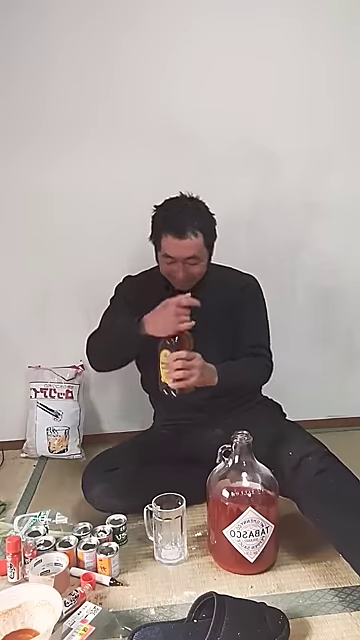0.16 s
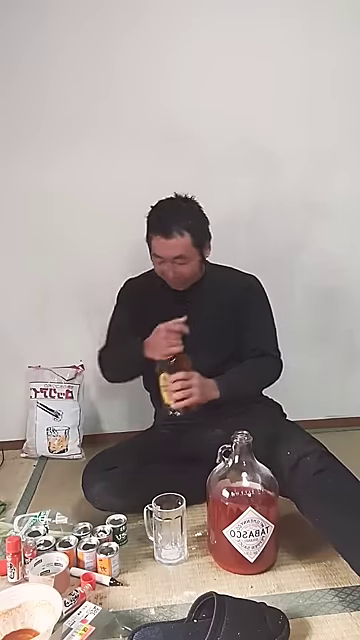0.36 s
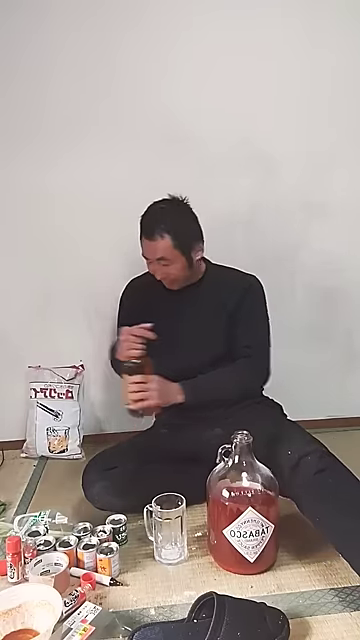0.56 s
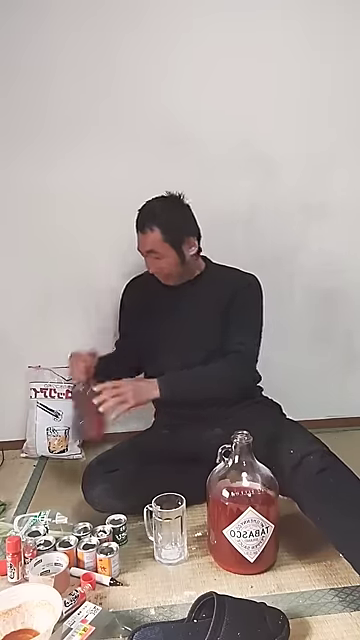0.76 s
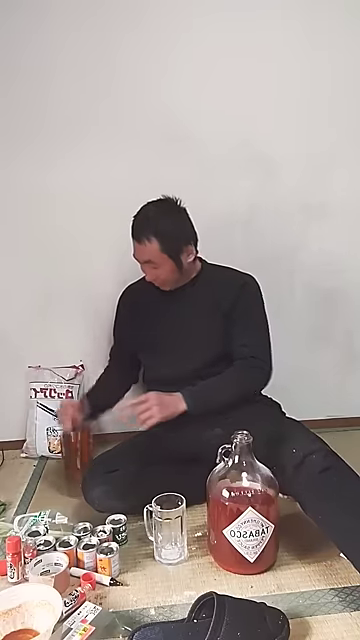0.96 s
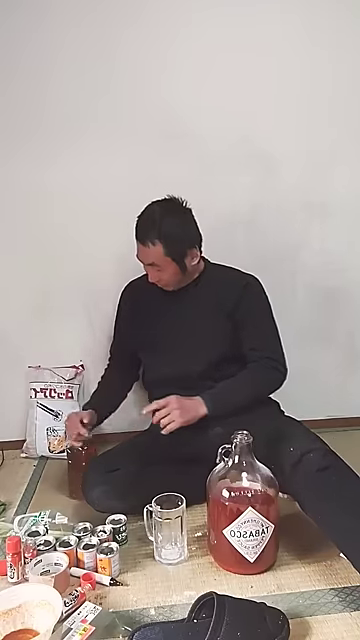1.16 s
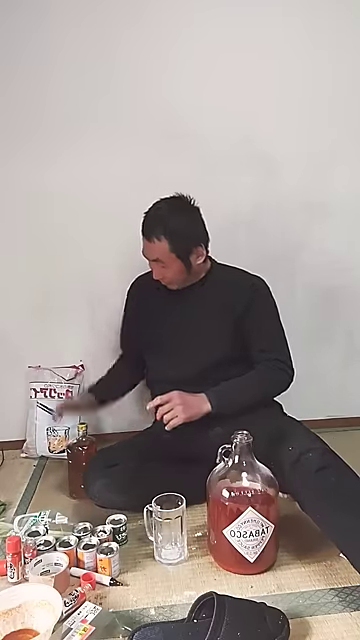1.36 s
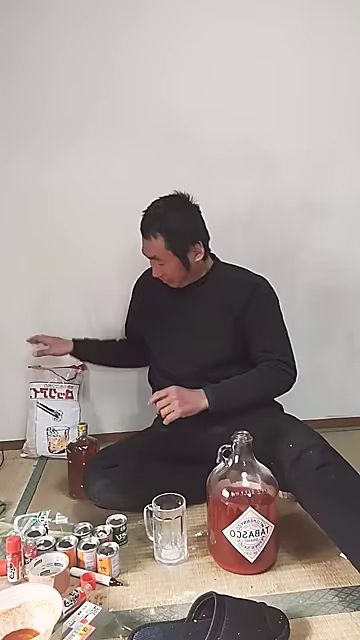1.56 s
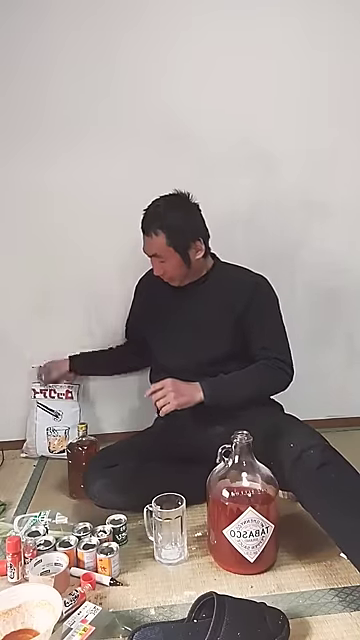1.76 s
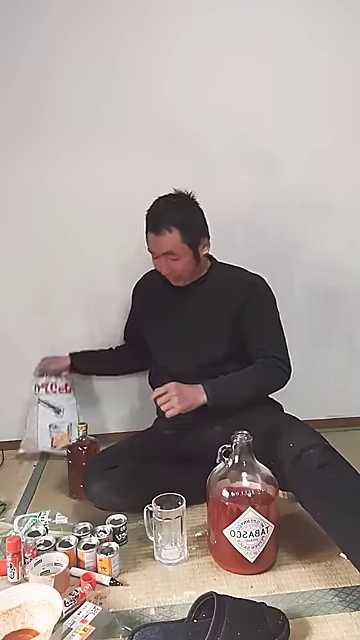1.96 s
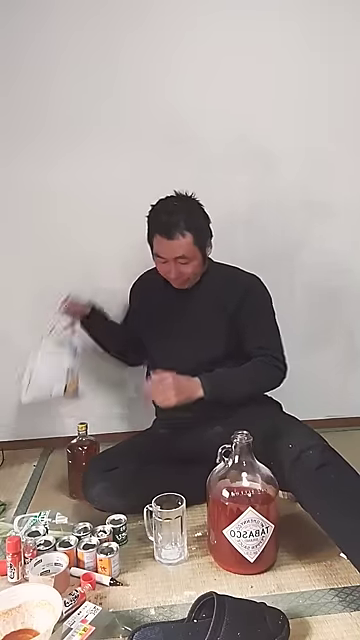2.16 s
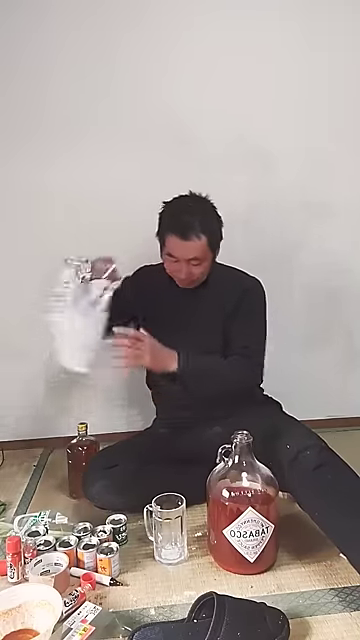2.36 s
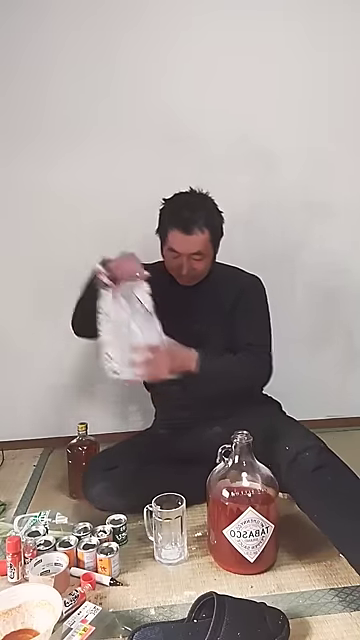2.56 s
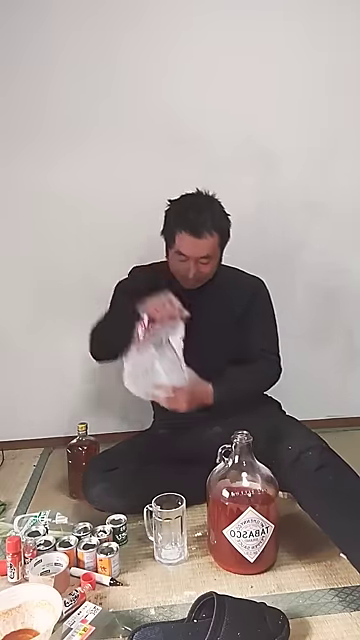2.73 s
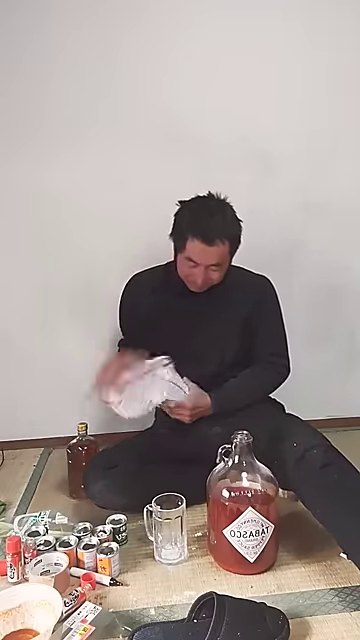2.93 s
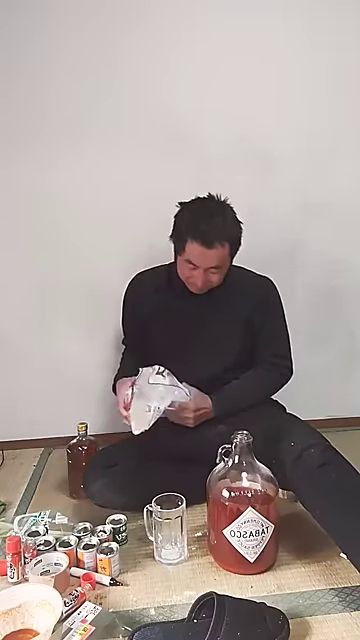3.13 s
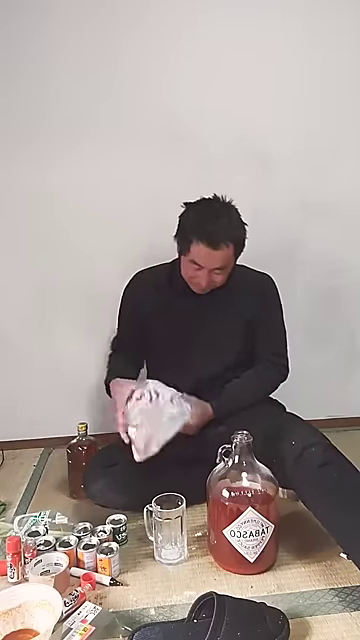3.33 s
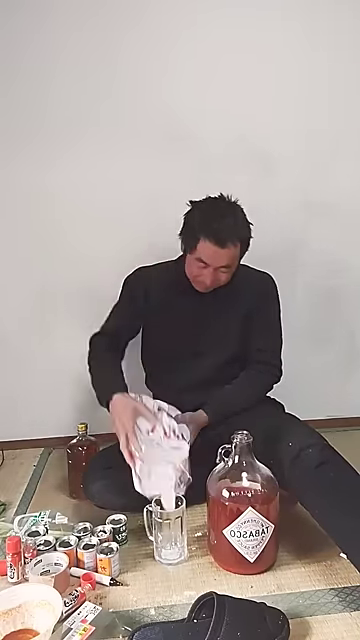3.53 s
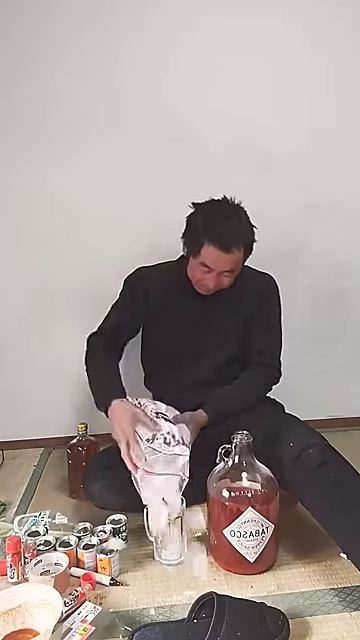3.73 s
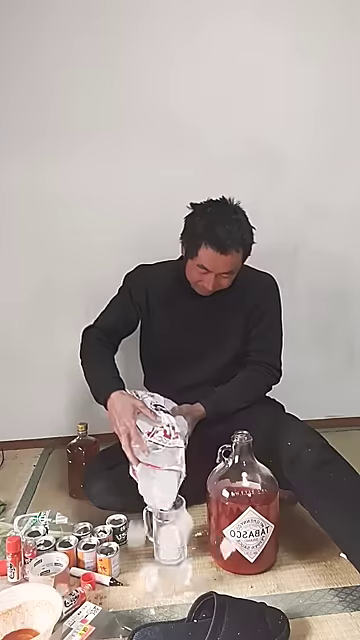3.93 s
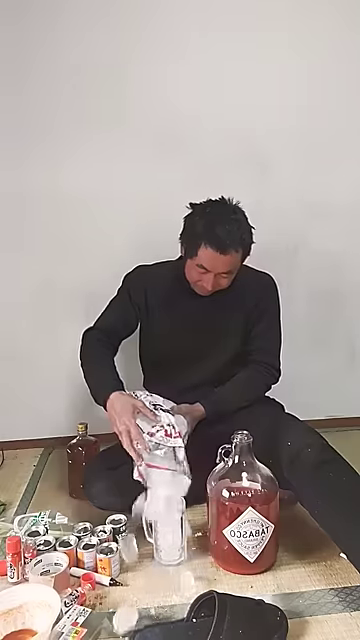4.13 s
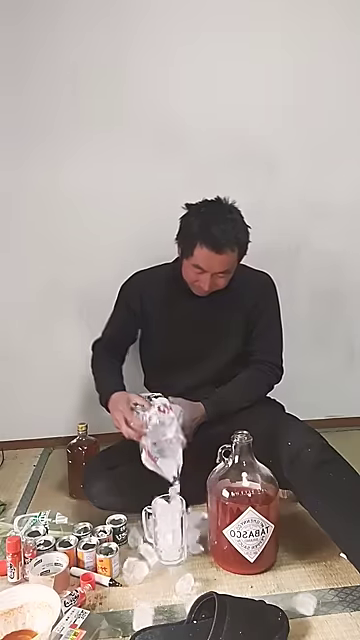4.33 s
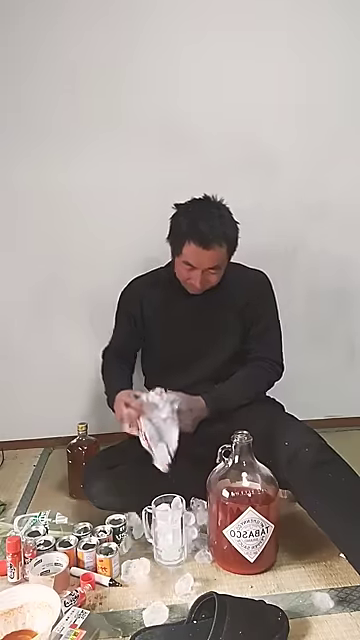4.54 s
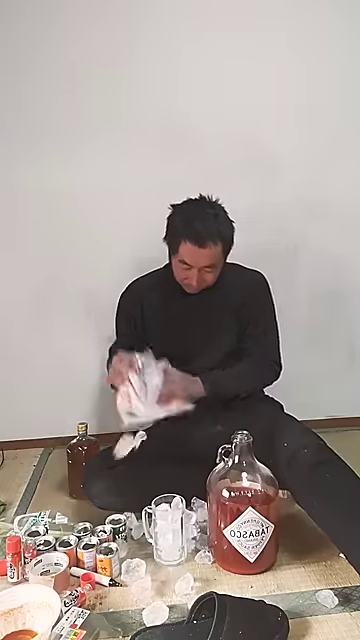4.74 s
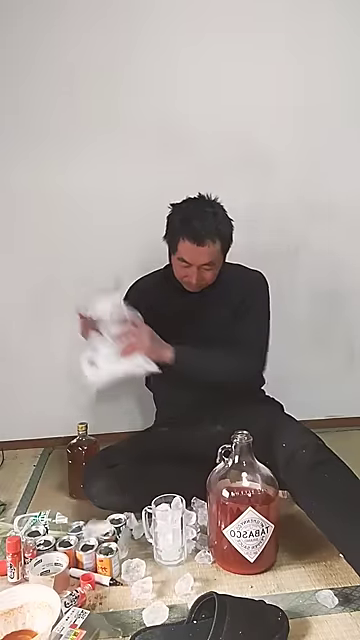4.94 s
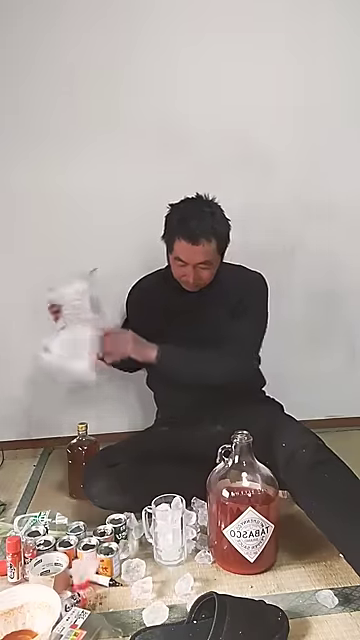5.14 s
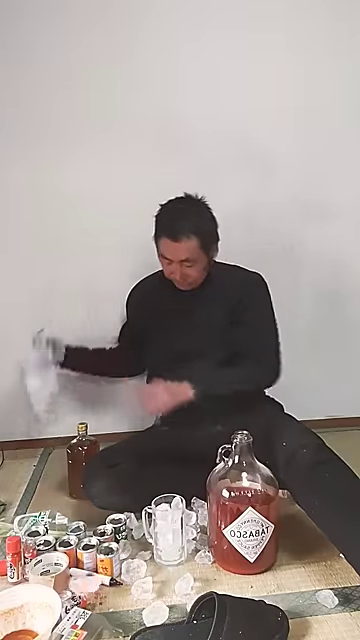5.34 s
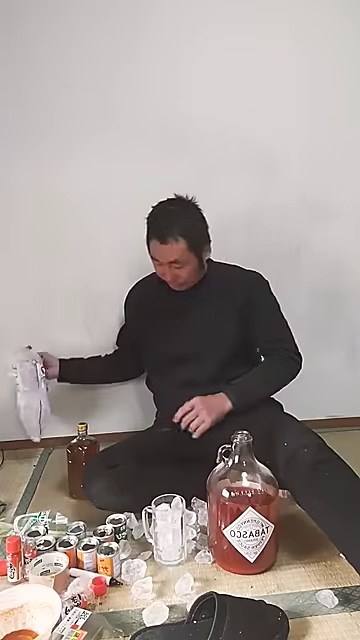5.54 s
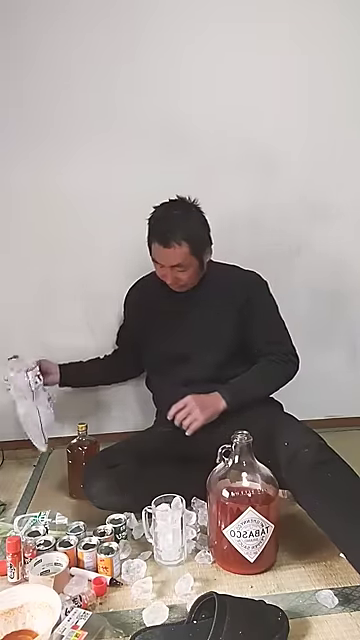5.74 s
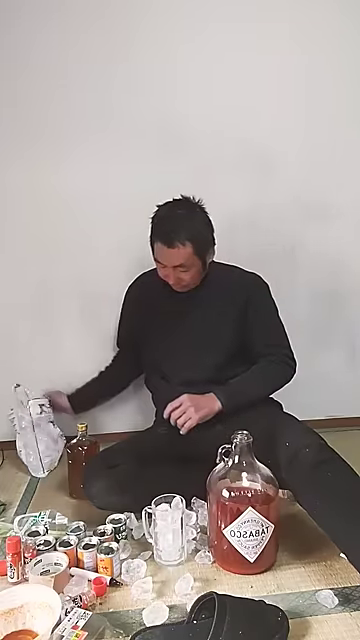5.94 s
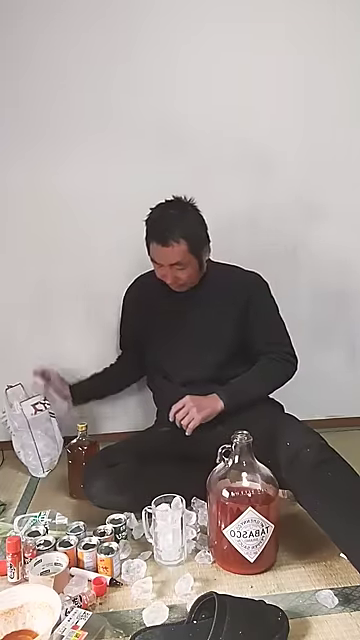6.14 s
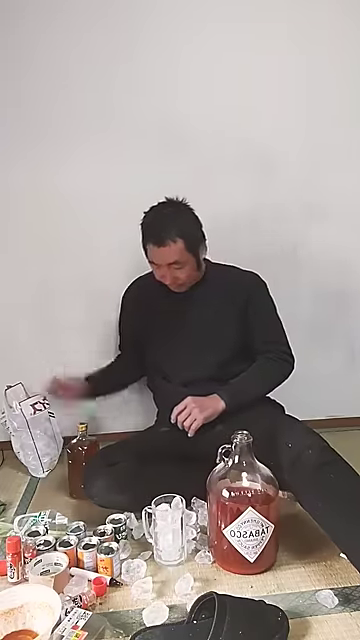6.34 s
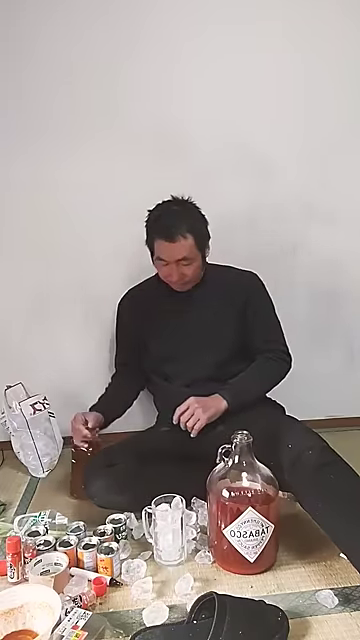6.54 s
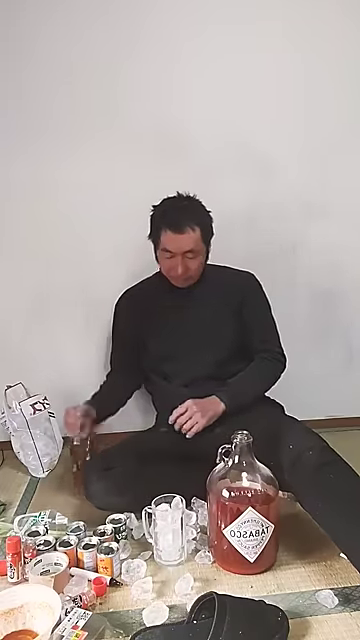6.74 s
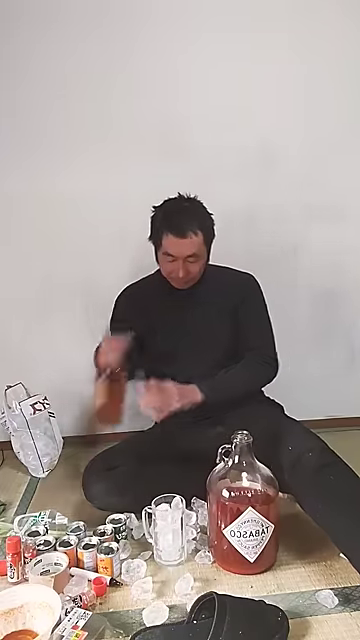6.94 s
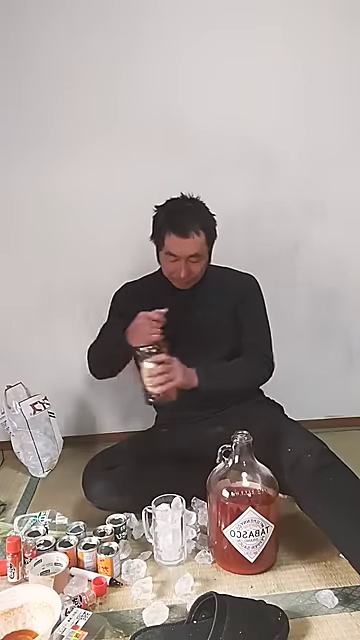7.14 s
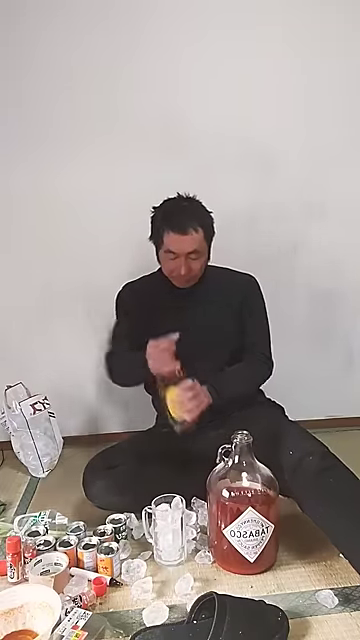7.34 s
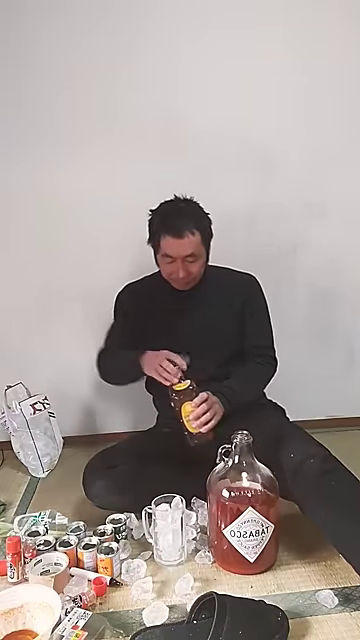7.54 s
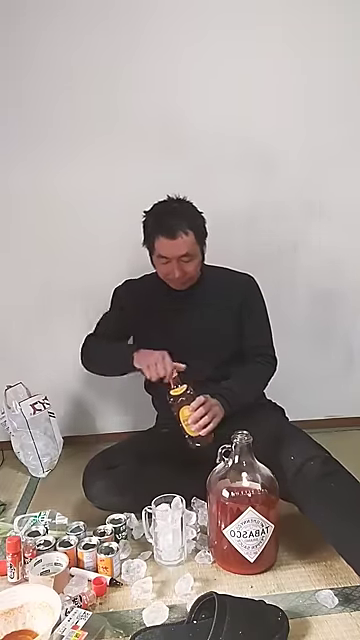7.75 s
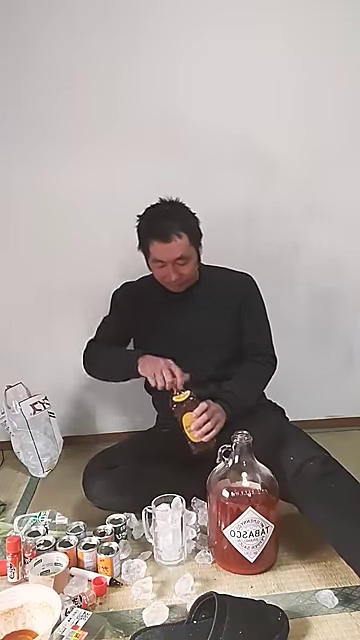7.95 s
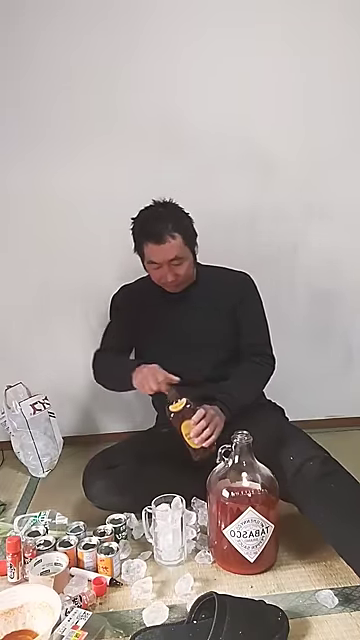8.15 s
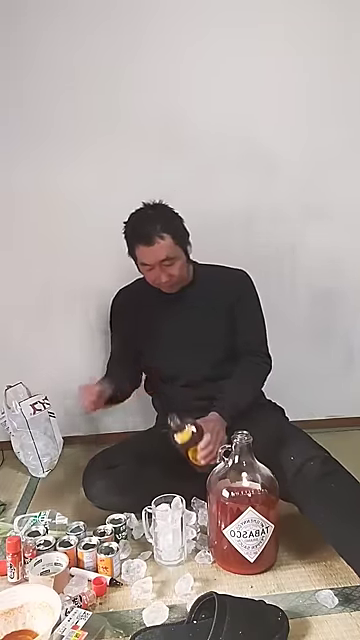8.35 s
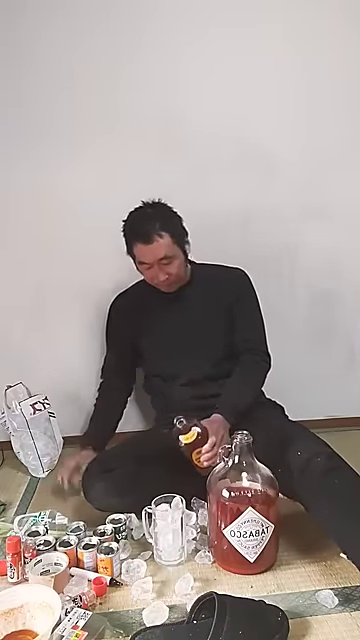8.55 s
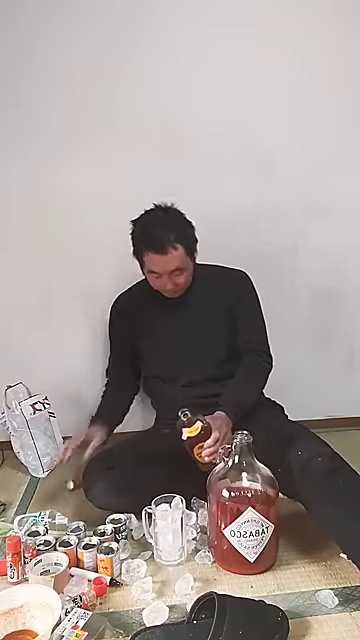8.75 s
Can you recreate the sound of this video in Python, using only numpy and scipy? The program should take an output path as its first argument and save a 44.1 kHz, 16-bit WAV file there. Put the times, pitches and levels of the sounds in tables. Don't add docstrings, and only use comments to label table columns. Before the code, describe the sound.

A bottle thuds onto a mat floor, a plastic ice bag crackles, cubes clatter brightly into a glass mug, then a cap is faintly unscrewed.

```python
import sys
import numpy as np
from scipy import signal
from scipy.fft import rfft, irfft
from scipy.io import wavfile

SR = 44100
rng = np.random.default_rng(int(sys.argv[2]) if len(sys.argv) > 2 else 0)


def put_to_file(sound):
    columns = np.atleast_2d(sound).T
    safe = np.clip(columns, -1, 1)
    whole_steps = np.round(safe * 32767)
    wavfile.write(sys.argv[1], SR, whole_steps.astype(np.int16))


def amplitude_ratio(level_db):
    exponent = np.asarray(level_db, float) / 20
    return 10 ** exponent


N = 392049

# time in seconds, rustle level in dB, share of dull grinding in dB.
HANDLING = [(0, -91, -26), (1.0, -83, -5), (1.14, -69, -5), (1.7, -66, -4.5), (1.72, -50, -8),
            (2.5, -49, -18), (2.72, -34, -17), (3.2, -43.5, -16.5), (3.5, -31.5, -15.5), (3.72, -37, -8.5),
            (4.3, -27, -12), (4.5, -44, -9.5), (5.9, -43, -13.5), (6.22, -46.5, -10), (6.3, -68, -10),
            (8.55, -79.5, -12), (8.61, -78, 1), (8.8, -76, -14)]
# start in seconds, peak in dB, favoured pitch in Hz, whole body in dB.
CLINKS = [(3.555, -8, 9140, -9), (3.6406, -26, 6230, -24.5), (3.7, -27, 6600, -25.5),
          (3.7339, -14, 14700, -30), (3.7594, -12, 10420, -30), (3.8005, -10, 9140, -19),
          (3.8204, -16, 6600, -23), (3.8721, -14, 6636, -18.5), (3.829, -23, 3270, -45),
          (3.8725, -15, 3270, -45), (3.8994, -26, 3270, -25), (3.9392, -14, 3270, -20),
          (3.9694, -19.5, 3270, -25), (3.9946, -23.5, 3270, -25), (4.0221, -11.5, 3260, -27),
          (4.0488, -16, 3280, -20), (4.0747, -11.5, 6900, -22), (4.0849, -2, 4650, -17),
          (4.103, -11.5, 6900, -23), (4.1244, -12.5, 9040, -24), (4.1445, -11, 5690, -23),
          (4.16, -6, 6650, -23), (4.1724, -4, 6610, -11), (4.2213, -11, 11100, -19),
          (4.2804, -10, 6220, -14), (4.3074, -7, 6300, -12), (4.3512, -9.5, 3430, -12),
          (4.365, 0, 6900, -36), (4.3965, -11, 6884, -22.5), (4.4258, -3, 11100, -15)]
# pitch in Hz, level in dB, T60 in seconds.
BOARDS = [(20, -8, 0.41), (44, -7.5, 0.17), (74.4, 0, 0.44), (105.5, -5, .25)]


def coloured(x, colour):
    hz, db = np.transpose(colour)
    grid_hz = np.maximum(np.fft.rfftfreq(4096, 1 / SR), 1)
    log_gain = np.log(amplitude_ratio(np.interp(np.log(grid_hz), np.log(hz), db)))
    cepstrum = irfft(log_gain)
    cepstrum[1:2048] *= 2
    cepstrum[2049:] = 0
    impulse = irfft(np.exp(rfft(cepstrum)))
    y = signal.oaconvolve(x, impulse)[:N]
    return y / np.std(y)


def curves(table):
    s, *columns = np.vstack(table).T
    return [np.interp(np.arange(N) / SR, s, column) for column in columns]


def room(x, wet_db=-0.5):
    t60_s, gap_s = 0.22, .0015
    t = np.arange(int(.25 * SR)) / SR
    tail = rng.standard_normal(len(t)) * amplitude_ratio(-60 * t / t60_s) * (t > gap_s)
    return x + amplitude_ratio(wet_db) * signal.oaconvolve(x, tail / np.linalg.norm(tail))[:N]


def crackle(rate_hz, spread_db, size=N):
    flurry = np.repeat(rng.exponential(size=size // 300 + 1), 300)[:size]
    out = (rng.random(size) < flurry * rate_hz / SR) * 1.
    at = np.flatnonzero(out)
    click_db = np.minimum(spread_db * rng.exponential(size=len(at)), 15)
    out[at] = amplitude_ratio(click_db) * rng.choice([-1, 1], len(at))
    return out


def add_ring(out, s, db, modes, scatter_db=0., rise_s=0.0001, flutter_db=0.):
    hz, mode_db, t60_s = np.transpose(modes)[:, :, None]
    t60_s = np.clip(t60_s, .002, .8)
    i = int(s * SR)
    t = np.arange(min(int(.75 * t60_s.max() * SR), N - i)) / SR
    level_db = db + mode_db + scatter_db * rng.standard_normal(hz.shape)
    gain = amplitude_ratio(level_db) * rng.choice([-1, 1], hz.shape)
    touch_rate_hz = 110
    touch = rng.standard_normal((len(hz), 100))
    touch = np.array([np.interp(t, np.arange(100) / touch_rate_hz, row) for row in touch])
    ring = amplitude_ratio(flutter_db * touch - 60 * t / t60_s) * np.sin(2 * np.pi * hz * t)
    out[i:i + len(t)] += (1 - np.exp(-t / rise_s)) * np.sum(gain * ring, axis=0)


def effort():
    # peak time in seconds, peak in dB, seconds to fall 20 dB.
    tugs = [(0, -66, 0.2), (.324, -63, .09), (.67, -64, .55), (1.051, -47, 0.11), (1.84, -42, 0.1),
            (2.279, -35, 0.14), (2.362, -37, 0.2), (2.522, -24, 0.42), (3.1, -32, 0.2), (3.37, -31.5, .5),
            (3.567, -24, 0.19), (3.742, -30, 0.4), (4.435, -27.5, .12), (4.81, -42, .3), (4.925, -25, 0.07),
            (5.034, -28, 0.113), (5.13, -29.5, 0.15), (5.27, -36, .6), (5.555, -39.5, .3),
            (5.934, -17, 0.0912), (6.12, -45, 0.1146), (7.922, -63.5, 0), (8.112, -62, 0.2),
            (8.625, -55, 0.2), (8.732, -61, 0.3)]
    # peak time in seconds, peak in dB, seconds per 20 dB either side.
    squeezes = [(1.932, -29, .15), (2.19, -42.5, 0.17), (2.829, -26, 0.1445), (2.984, -23.5, 0.1475),
                (3.293, -34.5, .15), (4.66, -36, .14), (5.409, -32.5, 0.21), (5.702, -38.5, .09),
                (6.74, -63, .1), (6.83, -65, .25), (7.125, -66, .08), (7.462, -51, .09),
                (7.72, -65.5, 0.46), (8.36, -68, 0.5)]
    tug_rise_s = .018
    t = np.arange(0, N / SR, .001)
    rows = [(s, db, tug_rise_s, fall_s) for s, db, fall_s in tugs]
    rows += [(s, db, fall_s, fall_s) for s, db, fall_s in squeezes]
    power = 0
    for s, db, rise_s, fall_s in rows:
        drop_db = 20 * np.maximum((s - t) / rise_s, (t - s) / fall_s)
        power = power + amplitude_ratio(db - drop_db) ** 2
    return np.sqrt(amplitude_ratio(curves(HANDLING)[0]) ** 2 + np.interp(np.arange(N) / SR, t, power))


def bag():
    # frequency in Hz, density in dB per Hz.
    rustle_colour = [(250, -35), (700, -11.5), (1300, -4.5), (2200, -1.5), (4600, -2), (5500, -6.5),
                     (6700, -1.5), (9300, -6.5), (14800, -1), (17000, -8)]
    dull_colour = [(53, -38.5), (90, 0), (215, -0.5), (485, -2), (794, -4), (853, -3.5), (1500, -4.5),
                   (1950, -30), (3300, -120)]
    cloth_colour = [(300, -20), (1000, -8), (2500, -3), (5500, -4), (7500, 0), (10000, -4), (16000, -3)]
    cloth_below_db = -56
    patches = 0
    for hz in (1500, 3200, 6500, 10500, 15000):
        patch = signal.lfilter(*signal.iirpeak(hz, 1.1, fs=SR), crackle(rate_hz=1400, spread_db=3.8))
        patches = patches + room(patch)
    film = coloured(patches + .7 * room(crackle(rate_hz=900, spread_db=4.0)), rustle_colour)
    cubes = coloured(sum(room(crackle(rate_hz=200, spread_db=4.0)) for place in range(3)), dull_colour)
    cloth = coloured(rng.standard_normal(N), cloth_colour)
    gain = effort()
    share = 1 / (1 + (amplitude_ratio(cloth_below_db) / gain) ** 2)
    rustle = np.sqrt(share) * film + np.sqrt(1 - share) * cloth
    return gain * (rustle + amplitude_ratio(curves(HANDLING)[1]) * cubes)


def sway():
    hum_db, sway_db = curves([(0, -81, 11), (.55, -81, 15), (1.03, -64, 15), (1.09, -19.5, 0),
                              (1.3, -46.5, 6.5), (1.63, -51.5, 21.5), (2.2, -70.5, 23.5), (2.48, -51, 0),
                              (3.24, -64, 16), (3.82, -41, 6), (4.65, -50, 2), (5.88, -53, 8),
                              (5.986, -33.5, -12), (6.37, -66, 17), (7.28, -74.5, 25.5), (8.1, -83, 31),
                              (8.89, -62, 11)])
    sway_colour = [(3, -10.5), (10, 0), (22, -4), (35, -20), (60, -49.5), (200, -91.5)]
    hum_colour = [(15, -39.5), (33, -10.5), (44, 2.5), (60, -7), (90, -12.5), (160, -21.5),
                  (300, -43), (600, -70)]
    slow = amplitude_ratio(sway_db + hum_db) * coloured(rng.standard_normal(N), sway_colour)
    return slow + amplitude_ratio(hum_db) * coloured(rng.standard_normal(N), hum_colour)


def add_small_knocks(out):
    # pitch in Hz, level in dB, T60 in seconds.
    dish = [(760, -6, .03), (5012, -2, .07), (7284, -1, .025), (9400, 0, .016), (11400, 0, .016),
            (13400, 0, .014), (14800, 0, .014)]
    tin = [(1001, -7, .15), (1604, -1, .18), (5000, -2, .03), (6584, -1, .1), (7014, 2, .04)]
    bottle = [(935, -7, 0.39), (2190, -4, 0.29), (2433, 2.5, .17), (3680, 5.5, 0.13), (7400, -12, .1)]
    cap = [(5550, -11, 0.065), (10200, -2, 0.083), (12420, -10.5, .15), (14300, -2, .1)]
    # start in seconds, level in dB.
    struck = [
        (4.9135, -12),
        (5.019, -25),
        (1.393, -62),
        (8.728, -44),
    ]
    # start in seconds, level in dB, pitch in Hz, T60 in seconds.
    pings = [(1.045, -56, 8900, .12), (1.15, -66, 2200, .25), (1.232, -60, 5351, .1),
             (1.393, -64, 5100, .03), (4.428, -26, 5717, .09), (5.05, -29, 6590, .07),
             (5.075, -34, 1604, .06), (5.303, -35, 11550, .12), (5.70, -33, 5040, .14),
             (6.87, -66, 3600, .12), (6.88, -75, 2400, .25), (7.13, -70, 2400, .08),
             (7.312, -62, 3850, .12), (7.365, -65, 5400, .05), (7.42, -62, 3700, .1),
             (7.465, -57, 3650, .25), (7.48, -62, 10300, .08), (7.50, -60, 2150, .1), (7.69, -66, 3700, .1),
             (8.095, -67, 2200, .2), (8.127, -62, 2245, .2), (8.097, -66, 3630, .15), (8.46, -74, 4900, .2),
             (8.618, -60, 10200, .12), (8.648, -49, 6130, .12)]
    # start in seconds, level in dB, pitch in Hz.
    ticks = [(.678, -66, 2150), (1.036, -41, 900), (2.17, -43, 1060), (2.525, -31, 790), (3.556, -32, 585),
             (3.733, -24, 610), (3.734, -23, 1640), (3.96, -34, 640), (4.04, -26, 1360), (4.10, -32, 945),
             (4.16, -30.5, 620), (5.127, -26, 2250), (5.345, -30.5, 1030), (5.49, -40, 1070),
             (3.765, -30, 1680), (6.991, -61, 420), (7.914, -61, 5060), (8.617, -43.5, 3270),
             (8.646, -46, 3000)]
    for s, db, hz, t60_s in pings:
        add_ring(out, s, db, [(hz, -3, t60_s), (1.025 * hz, -8, .6 * t60_s)], flutter_db=4.5)
    for (s, db), modes in zip(struck, (dish, tin, bottle, cap)):
        add_ring(out, s, db, modes, flutter_db=4.5)
    for s, db, hz in ticks:
        modes = [(hz, 0, .05), (1.06 * hz, -3, .03), (.93 * hz, -4, .03),
                 (1.17 * hz, -7, .02), (.82 * hz, -7, .02)]
        add_ring(out, s, db, modes, flutter_db=2.5)


def snaps():
    # start in seconds, peak in dB, pitch in Hz, T60 in seconds.
    mat_crunch = (1.033, -33, 2500, .16)
    # start in seconds, peak in dB, brightest pitch in Hz.
    cracks = [(1.033, -19, 1690), (3.6644, -19, 2194), (4.1724, -3, 6500), (4.165, -8, 7000),
              (4.2892, -5, 14000), (4.4845, -15, 12000), (4.2494, -11, 6290), (4.4885, -13, 1630),
              (4.9141, 3, 7000), (4.9174, 7, 9500), (5.018, -2, 9000), (4.9205, 3, 7300),
              (4.968, -20, 2500), (5.049, -20, 2500), (6.9904, -50, 1000), (7.9134, -43, 5300),
              (8.617, -42, 14500), (8.8024, -38.5, 8440)]
    crack_t60_s, clink_crack_db = 0.014, -9
    rows = [mat_crunch] + [(s, db, hz, crack_t60_s) for s, db, hz in cracks]
    rows += [(s, db + clink_crack_db, hz, crack_t60_s) for s, db, hz, _ in CLINKS]
    out = np.zeros(N)
    t = np.arange(int(.2 * SR)) / SR
    for s, db, hz, t60_s in rows:
        decay = amplitude_ratio(-60 * t / 0.0043) + 0.45 * amplitude_ratio(-60 * t / np.clip(t60_s, .002, .3))
        burst = rng.standard_normal(len(t)) * decay
        burst = 0.2 * burst + signal.lfilter(*signal.iirpeak(hz, 1.8, fs=SR), burst)
        i = int(s * SR)
        out[i:i + len(t)] += amplitude_ratio(db - 1) * burst[:N - i] / abs(burst).max()
    return room(signal.sosfilt(signal.butter(2, 900, "high", fs=SR, output="sos"), out))


def set_down():
    # start in seconds, peak in dB, mat pitch in Hz, boards in dB.
    blows = [(1.035, -13.5, 135, -7), (1.507, -40, 134, -45), (1.624, -40.5, 171, -41),
             (1.927, -38, 199, -45.5), (2.92, -33.5, 123, -37), (5.522, -33, 203, -41),
             (5.764, -36, 213, -44), (5.917, -21.5, 166, -22), (5.939, -17, 123, -22.5),
             (6.12, -37, 191, -57), (8.612, -42.5, 121, -47.5), (8.654, -42, 122, -43)]
    out = np.zeros(N)
    for s, db, hz, boards_db in blows:
        mat = [(hz, 0, .07), (1.55 * hz, -7, .05), (.7 * hz, -5, .09), (2.4 * hz, -13, .04), (3.4 * hz, -18, .03)]
        add_ring(out, s, db - 1, mat, scatter_db=2.0, rise_s=.0012, flutter_db=3.0)
        add_ring(out, s, boards_db - 2.0, BOARDS, rise_s=0.0071)
    return out


def clicks():
    # start in seconds, peak in dB, brightest pitch in Hz.
    creases = [(1.7054, -49, 7500), (1.7364, -35, 6300), (1.7676, -39, 7700), (1.7868, -31, 2500),
               (1.8182, -23, 4800), (1.8452, -24, 4100), (1.881, -10, 14200), (1.8849, -17, 14500),
               (1.9131, -16, 2400), (2.1317, -34, 2400), (2.1403, -27, 4700), (2.1496, -29, 6500),
               (2.1722, -30, 2400), (2.2756, -23, 3800), (2.2824, -23, 7200), (2.305, -25, 10400),
               (2.3573, -19, 14700), (2.4336, -31, 4200), (2.463, -29, 4200), (2.4845, -24, 8100),
               (2.5046, -11, 8300), (2.5089, -8, 14200), (2.6118, -16, 3700), (2.6189, -17, 10800),
               (2.6521, -13, 6700), (2.6605, -14, 4600), (2.7256, -17, 6600), (2.7321, -17, 7000),
               (2.7509, -16, 14400), (2.7672, -18, 7800), (2.8197, -8, 10400), (2.8442, -13, 14400),
               (2.872, -17, 6900), (2.887, -8, 11200), (2.9742, -8, 2900), (3.0016, -10, 4200),
               (3.087, -18, 13000), (3.0955, -20, 6500), (3.1161, -18, 4700), (3.2073, -25, 3100),
               (3.2148, -26, 2800), (3.2447, -28, 7100), (3.3006, -14, 14600), (3.3603, -12, 10900),
               (3.3671, -14, 7400), (3.4187, -16, 14400), (3.4444, -16, 7300), (3.453, -12, 8000)]
    late_creases = [(4.5218, -19, 4000), (4.543, -18, 4300), (4.5639, -16, 9500), (4.5724, -21, 13400),
                    (4.675, -21, 14000), (4.7543, -31, 6400), (4.7871, -28, 13500), (4.8243, -20, 10900),
                    (4.8886, -30, 14400), (4.968, -14, 2800), (5.0192, -7, 14600), (5.0842, -16, 7100),
                    (5.1078, -22, 14800), (5.1279, -11, 2200), (5.133, -12, 2600), (5.1832, -22, 4400),
                    (5.1884, -22, 4600), (5.193, -21, 7400), (5.2005, -14, 3900), (5.261, -20, 9100),
                    (5.2704, -21, 5300), (5.3088, -20, 14600), (5.34, -23, 10500), (5.3472, -23, 14900),
                    (5.3527, -18, 6800), (5.4052, -16, 15000), (5.4115, -17, 10700), (5.4236, -19, 14800),
                    (5.4914, -26, 7700), (5.5222, -26, 6600), (5.5428, -28, 6900), (5.5484, -18, 11900),
                    (5.5603, -21, 3500), (5.6088, -20, 14400), (5.6123, -26, 15100), (5.6449, -29, 14500),
                    (5.6848, -28, 2600), (5.7029, -23, 4800), (5.7508, -24, 3600), (5.7697, -24, 14500),
                    (5.7853, -29, 6200), (5.8025, -29, 7800), (5.8376, -26, 4800), (5.8999, -28, 14100),
                    (6.0355, -25, 14700), (6.1232, -9, 14400), (6.1318, -22, 7500), (6.1965, -31, 8500)]
    cap_clicks = [(6.3413, -56, 3100), (6.3558, -43, 14300), (6.3663, -51, 12400), (6.4755, -50, 14600),
                  (6.5538, -47, 10800), (6.8385, -48, 14800), (6.9922, -56, 1600), (7.0386, -59, 4600),
                  (7.6542, -52, 12100), (7.6807, -53, 14600), (7.69, -49, 3600), (7.7156, -52, 15100),
                  (7.7374, -52, 7700), (7.7469, -50, 5200), (7.7603, -50, 8800), (7.8303, -54, 14600),
                  (7.915, -40, 14300), (8.0, -49, 14800), (8.096, -49, 2700), (8.4741, -61, 6900)]
    spike_t60_s, fizz_t60_s = .0022, .03
    out = np.zeros(N)
    t = np.arange(int(.03 * SR)) / SR
    for s, db, hz in list(creases) + list(late_creases) + list(cap_clicks):
        decay = amplitude_ratio(-60 * t / spike_t60_s) + .18 * amplitude_ratio(-60 * t / fizz_t60_s)
        spike = rng.standard_normal(len(t)) * decay
        peak = signal.iirpeak(np.clip(hz, 500, 16000), 1.4, fs=SR)
        spike = .35 * spike + signal.lfilter(*peak, spike)
        i = int(s * SR)
        out[i:i + len(t)] += amplitude_ratio(db + 2.2) * spike / abs(spike).max()
    return room(signal.sosfilt(signal.butter(2, 1000, "high", fs=SR, output="sos"), out), wet_db=-4)


def rattle(modes):
    # time in seconds, level in dB.
    level = [
        (3.55, -69.5),
        (3.6, -38.5),
        (3.75, -36.5),
        (3.9, -32),
        (4.1, -28),
        (4.28, -32),
        (4.45, -41),
        (4.52, -72),
    ]
    out = np.zeros(N)
    i, j = int(level[0][0] * SR), int(level[-1][0] * SR)
    for hz, db, t60_s in modes:
        pole = amplitude_ratio(-60 / (t60_s * SR))
        resonator = [1, -2 * pole * np.cos(2 * np.pi * hz / SR), pole ** 2]
        ring = signal.lfilter([1], resonator, crackle(rate_hz=90, spread_db=4., size=j - i))
        out[i:j] += amplitude_ratio(db) * ring / np.std(ring)
    return amplitude_ratio(curves(level)[0] - 8.0) * out


def add_mug(out):
    rim_hz = [2222, 2346]
    wall_hz = [3271, 4639, 5717, 6240, 6612, 6900, 7550]
    top_hz = [9128, 10380, 11115, 11925, 12965, 14100, 14660, 15200]
    rim = np.c_[rim_hz, [(-7, 0.2), (-5, 0.16)]]
    wall = np.c_[wall_hz, [(-9, .15), (-3, 0.064), (-6.5, 0.13), (-3.5, 0.086), (0.5, 0.059), (-3, .11),
                           (-2.5, 0.15)]]
    top = np.c_[top_hz, [(-3, 0.061), (-9, .06), (-4.5, 0.069), (-10.5, 0.076), (-8.5, .07), (-10, .06),
                         (-8, .04), (-8, .06)]]
    # pitch in Hz, level in dB, T60 in seconds.
    mug_air = (610, -7, .08)
    # start in seconds, lower ring in dB, upper ring in dB.
    rim_hits = [(3.555, -25, -21), (3.622, -33, -40), (3.70, -38, -35), (3.734, -33, -38),
                (3.762, -29, -34), (3.8004, -29, -27), (3.821, -36, -29), (3.875, -27, -24),
                (3.90, -30, -35), (3.939, -32, -30), (3.972, -29, -33), (4.021, -30, -26), (4.06, -30, -34),
                (4.084, -28, -29), (4.104, -25, -23), (4.146, -33, -30), (4.170, -28, -21),
                (4.194, -33, -27), (4.219, -26, -27), (4.365, -40, -35), (4.394, -30, -31),
                (4.425, -34, -28)]
    top_db, top_db_per_octave = -12, 4
    upper = np.vstack([wall, top])
    out += rattle(np.vstack([rim + [0, 4.5, 0], wall, top - [0, 4, 0], mug_air]))
    for s, low_db, high_db in rim_hits:
        add_ring(out, s, 2.5, np.c_[rim_hz, (low_db - 2.5, high_db + 1.5), rim[:, 2]], flutter_db=1.2)
    for s, db, hz, body_db in CLINKS:
        add_ring(out, s, body_db - 13, wall, scatter_db=1.0, flutter_db=4.0)
        bright_db = top_db + top_db_per_octave * np.log2(hz / 7000)
        add_ring(out, s, body_db + bright_db, top, scatter_db=2.0, flutter_db=5.0)
        favoured_hz, _, t60_s = upper[np.argmin(abs(upper[:, 0] - hz))]
        add_ring(out, s, db - 10, [(favoured_hz, 0, t60_s)], flutter_db=2.0)


def spilt():
    # start in seconds, peak in dB, mat pitch in Hz.
    landings = [(3.598, -28, 121), (3.664, -23.5, 215), (3.784, -23, 346), (3.852, -21.5, 349),
                (3.866, -15, 183), (3.909, -26.5, 172), (3.996, -15, 212), (4.041, -19.5, 180),
                (4.152, -19, 184), (4.199, -27.5, 189), (4.251, -25.5, 153), (4.284, -19, 228),
                (4.308, -20.5, 137), (4.349, -25, 127), (4.413, -27, 178), (4.469, -24.5, 208),
                (4.549, -33, 121), (4.966, -23.5, 252), (5.001, -30.5, 136), (5.121, -34, 157),
                (5.195, -31, 222)]
    boards_db = -18
    out = np.zeros(N)
    for s, db, hz in landings:
        mat = [(hz, 0, .055), (1.5 * hz, -3, .03), (.7 * hz, -5, .06), (2.2 * hz, -8, .022), (3.2 * hz, -14, .016)]
        add_ring(out, s, db - .3, mat, scatter_db=2.2, rise_s=.0009, flutter_db=1.5)
        add_ring(out, s, db + boards_db, BOARDS, rise_s=0.006)
    return out


def add_jug(out):
    jug_hz = [1319, 1500, 1610, 2632, 3171, 3408, 3510, 3607, 4126, 5039, 6293]
    jug = np.c_[jug_hz, [(-16, .75), (-17, 0.46), (-8.5, 0.56), (-15, 0.29), (-8.5, 0.18), (-3, .24),
                         (-9.5, .25), (-5.5, .25), (-8, 0.13), (-1, 0.11), (-5, 0.14)]]
    # start in seconds, peak in dB.
    hits = [
        (4.2494, -22.5),
        (4.2892, -10),
        (4.3074, -5.5),
        (4.3244, -17),
        (4.4393, -17),
        (4.4875, -18.5),
    ]
    for s, db in hits:
        add_ring(out, s, db - 14.5, jug, scatter_db=0.5, flutter_db=4.5)


def glass():
    out = np.zeros(N)
    add_small_knocks(out)
    add_mug(out)
    add_jug(out)
    return amplitude_ratio(1.5) * room(out, wet_db=-5)


def scene():
    hiss = amplitude_ratio(-84) * rng.standard_normal(N)
    floor = sway() + set_down() + spilt()
    return (bag() + clicks() + snaps() + glass() + floor + hiss)[None]


def roll_off(x):
    return signal.sosfilt(signal.butter(12, 16660, fs=SR, output="sos"), x)


def record(dry):
    cut = signal.sosfilt(signal.ellip(8, .3, 44, 15600, fs=SR, output="sos"), dry)
    return roll_off(np.clip(cut, -1, 1))


dry = scene()
out = record(dry)
put_to_file(out)
```